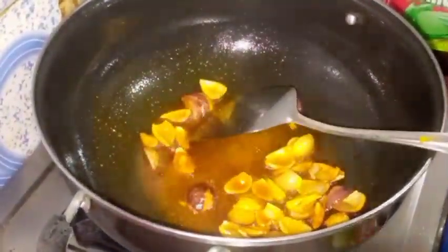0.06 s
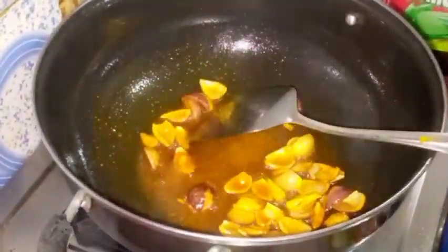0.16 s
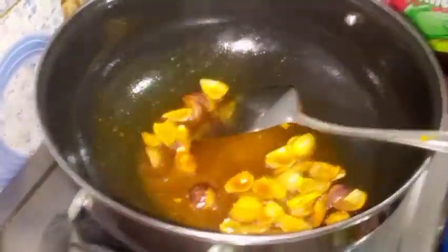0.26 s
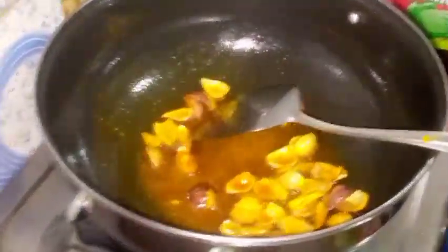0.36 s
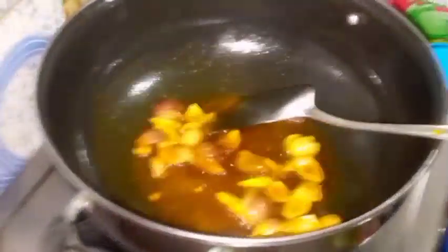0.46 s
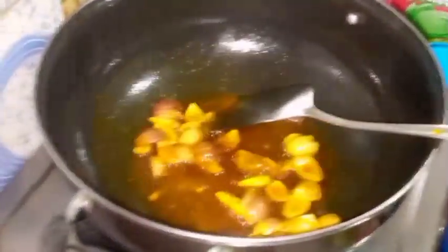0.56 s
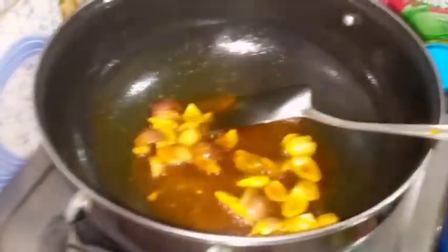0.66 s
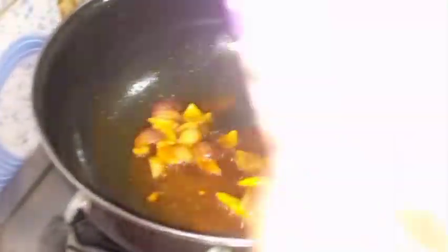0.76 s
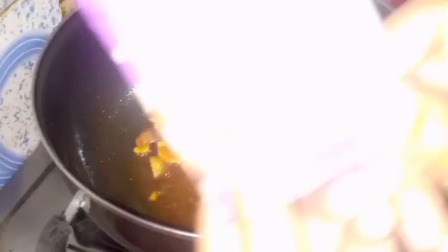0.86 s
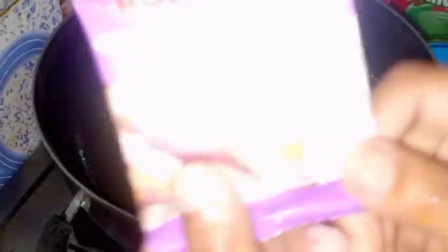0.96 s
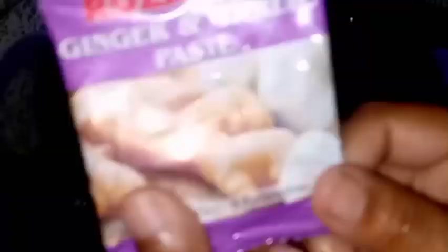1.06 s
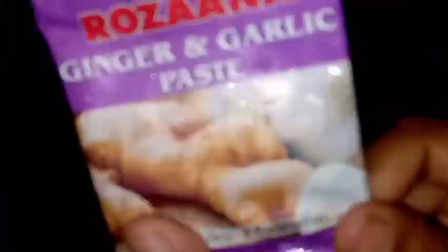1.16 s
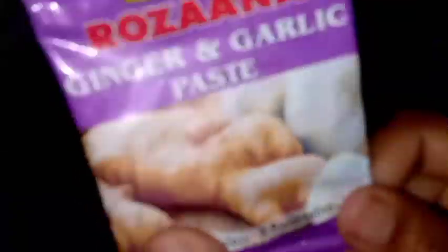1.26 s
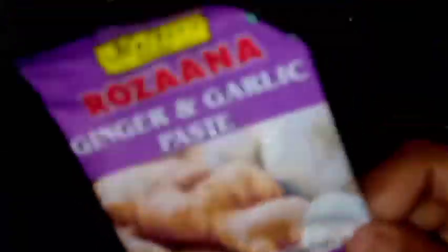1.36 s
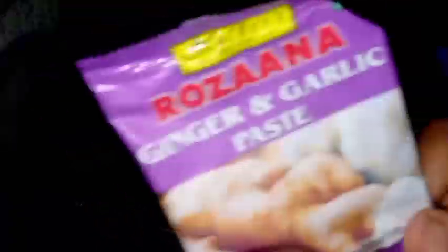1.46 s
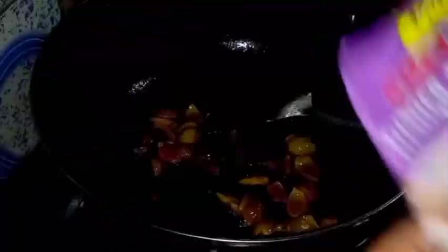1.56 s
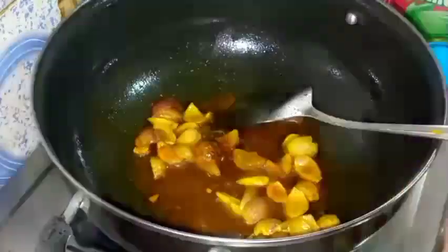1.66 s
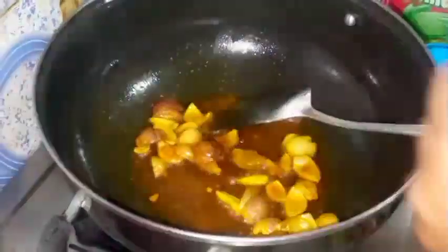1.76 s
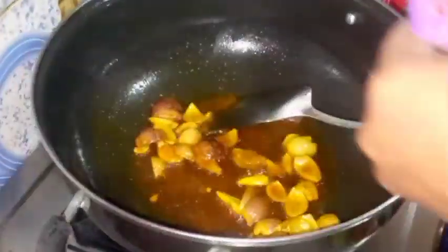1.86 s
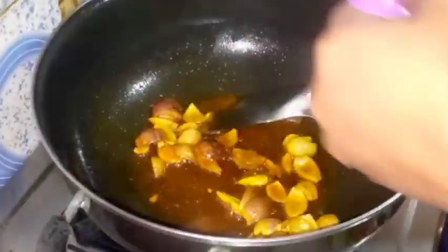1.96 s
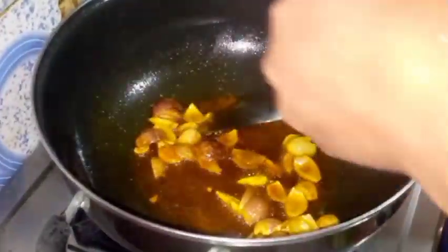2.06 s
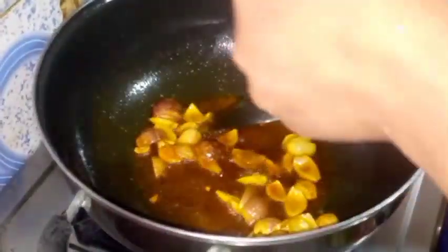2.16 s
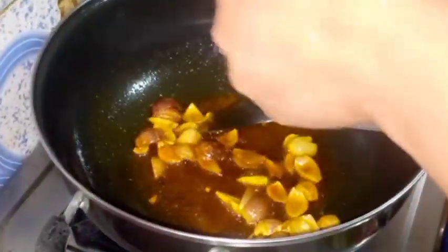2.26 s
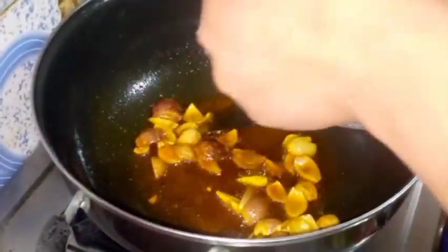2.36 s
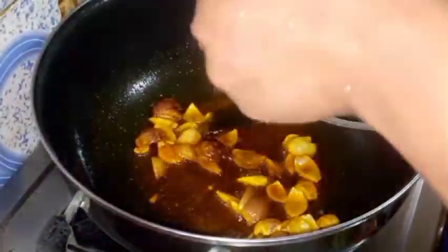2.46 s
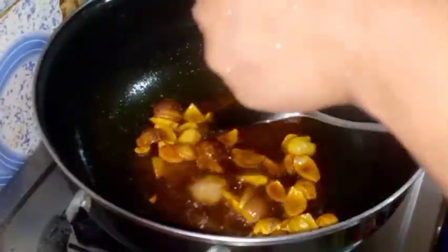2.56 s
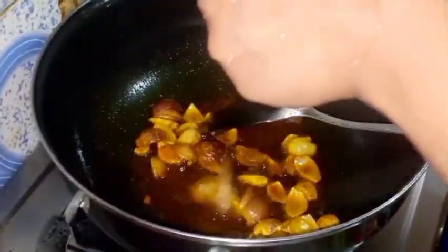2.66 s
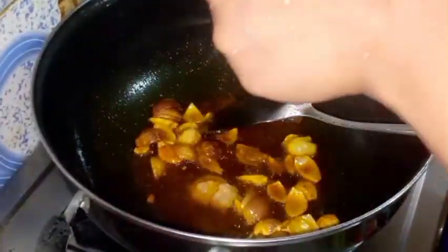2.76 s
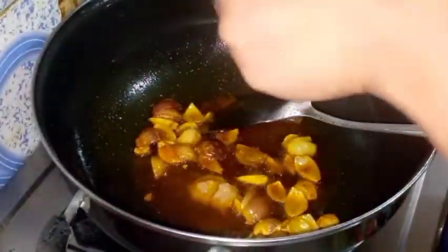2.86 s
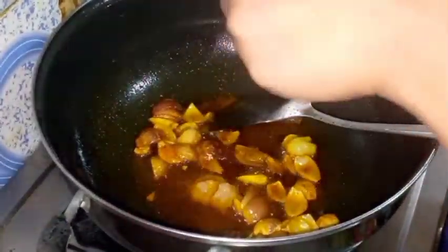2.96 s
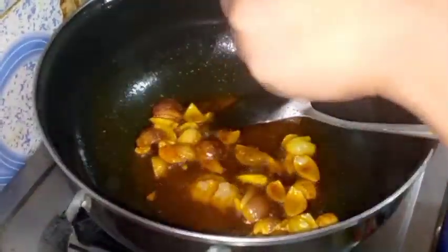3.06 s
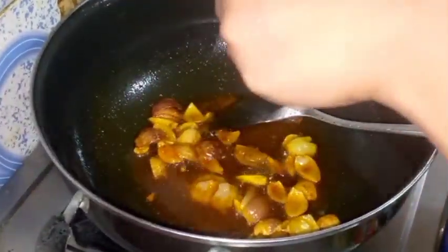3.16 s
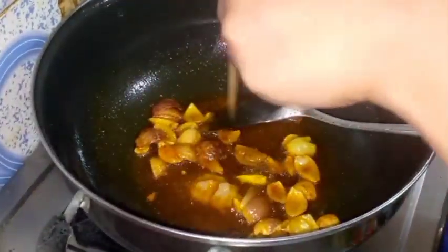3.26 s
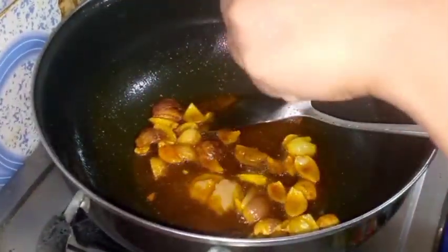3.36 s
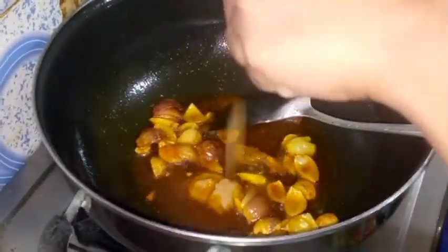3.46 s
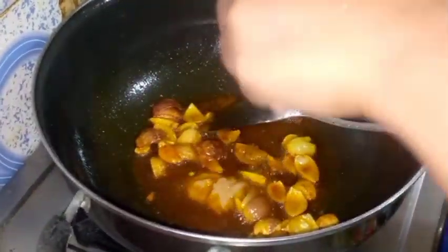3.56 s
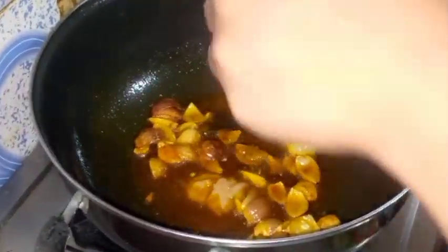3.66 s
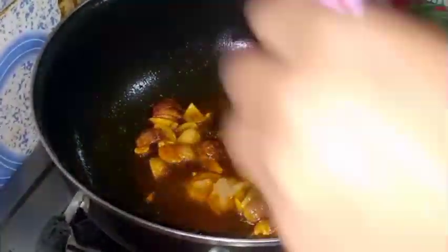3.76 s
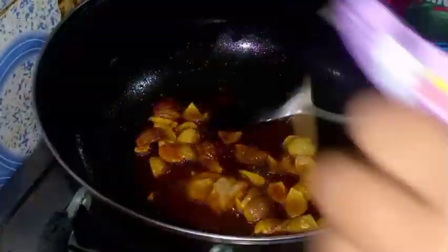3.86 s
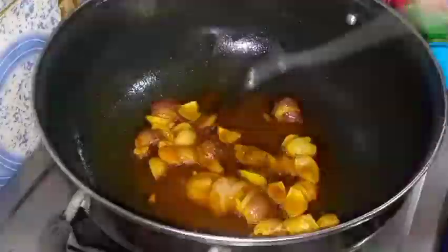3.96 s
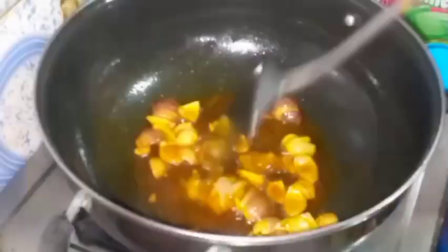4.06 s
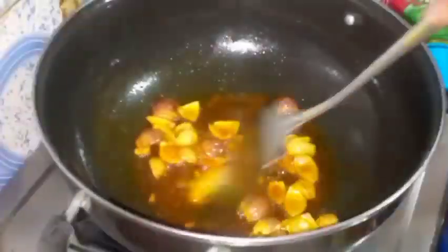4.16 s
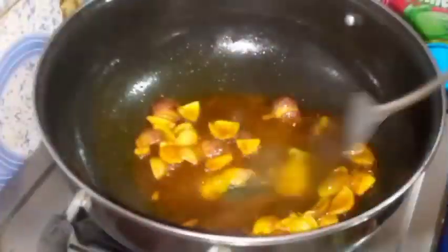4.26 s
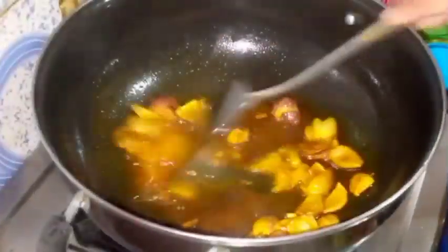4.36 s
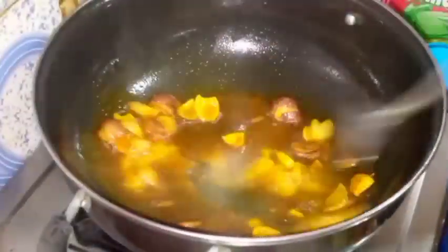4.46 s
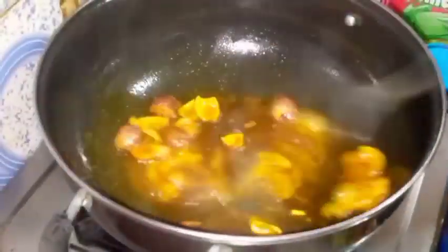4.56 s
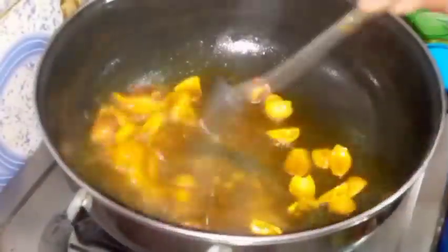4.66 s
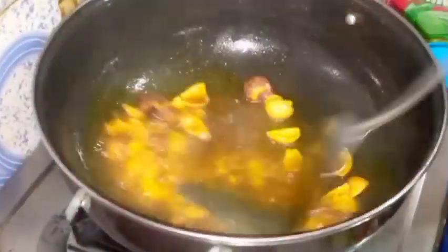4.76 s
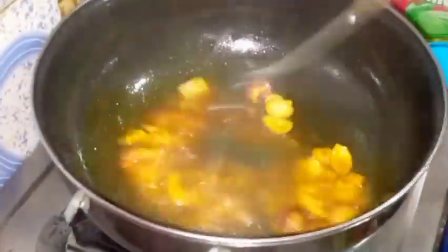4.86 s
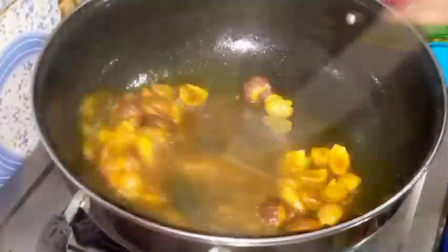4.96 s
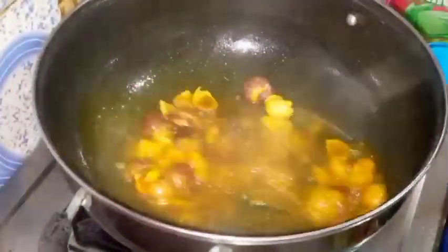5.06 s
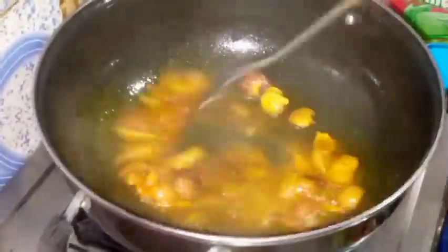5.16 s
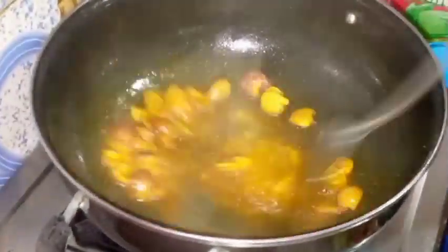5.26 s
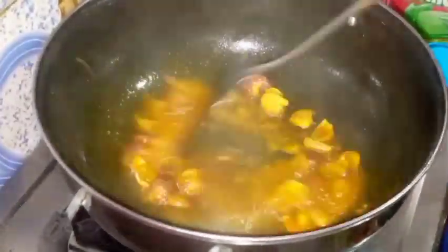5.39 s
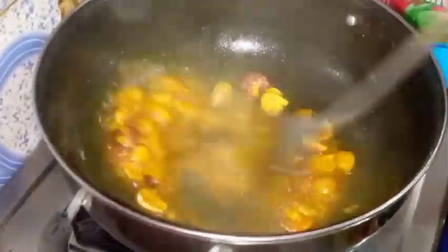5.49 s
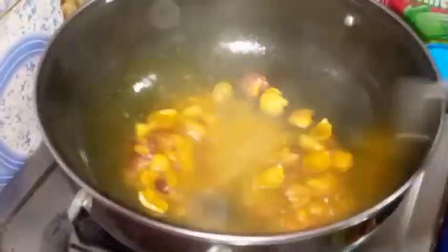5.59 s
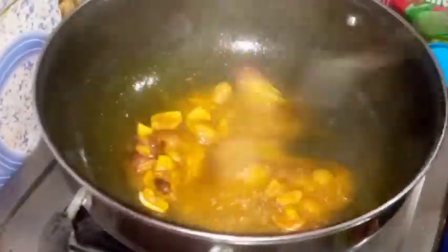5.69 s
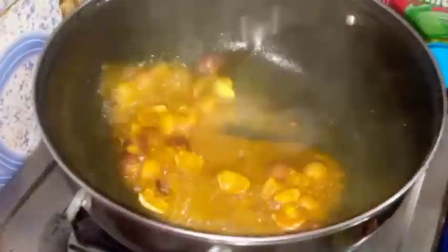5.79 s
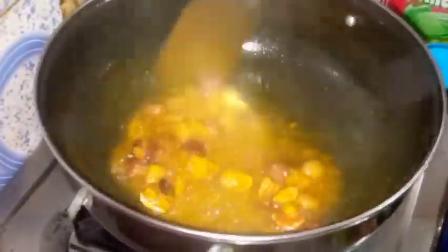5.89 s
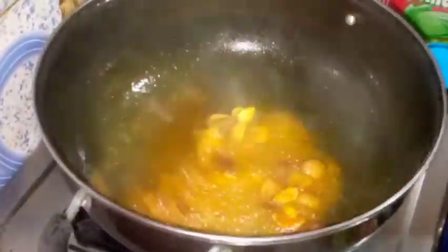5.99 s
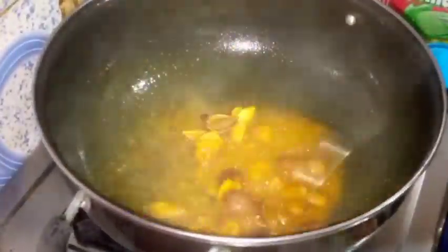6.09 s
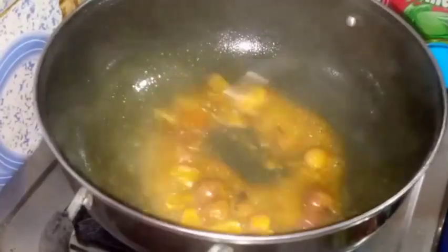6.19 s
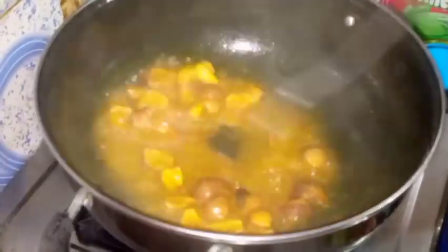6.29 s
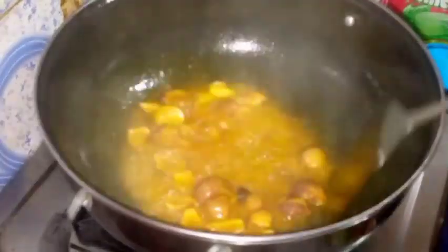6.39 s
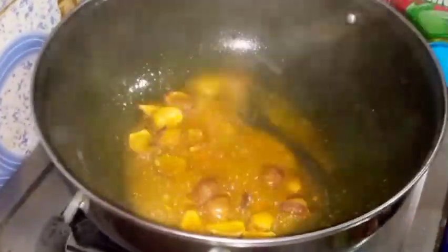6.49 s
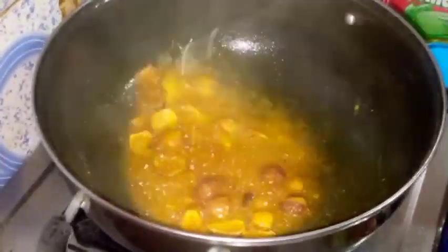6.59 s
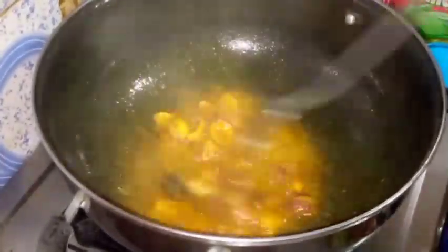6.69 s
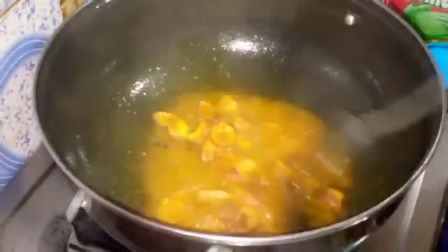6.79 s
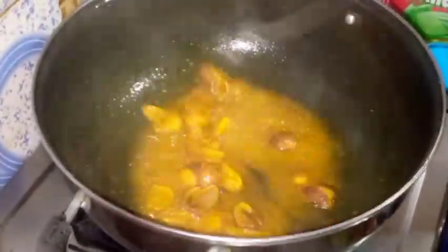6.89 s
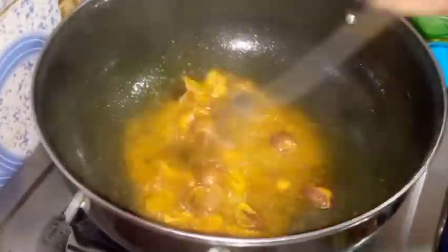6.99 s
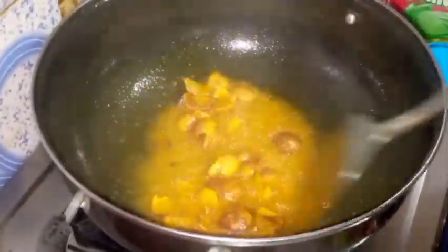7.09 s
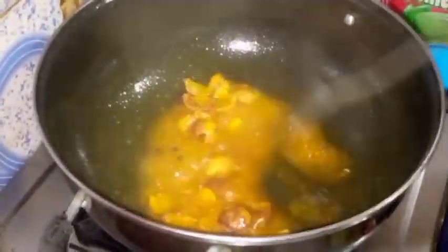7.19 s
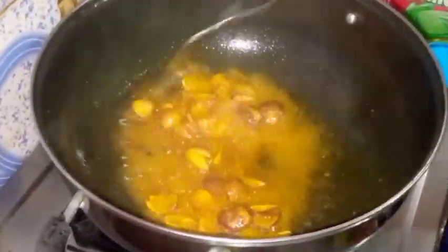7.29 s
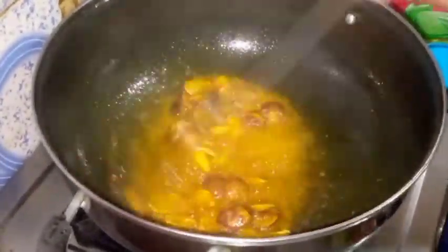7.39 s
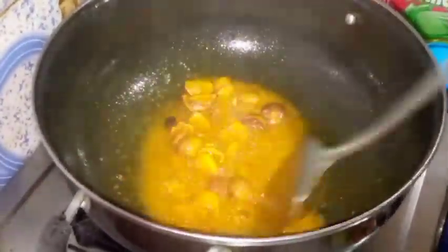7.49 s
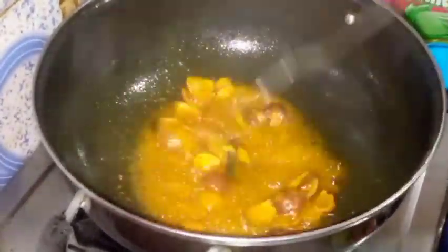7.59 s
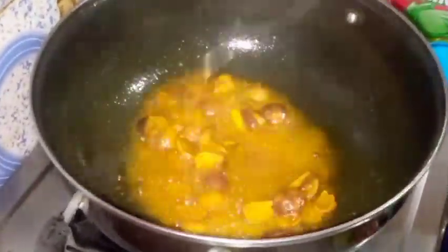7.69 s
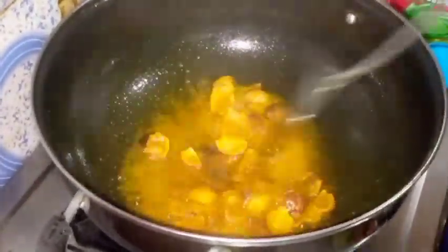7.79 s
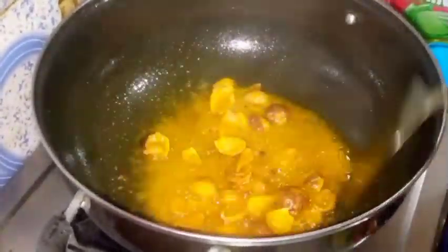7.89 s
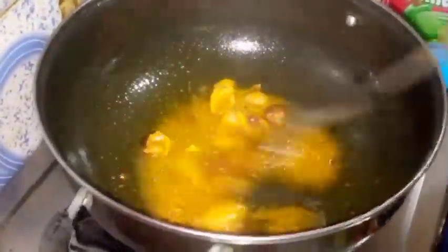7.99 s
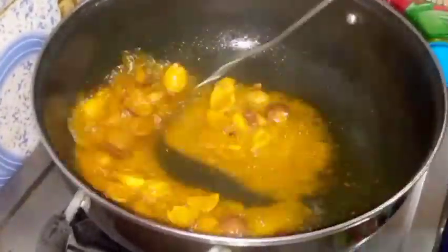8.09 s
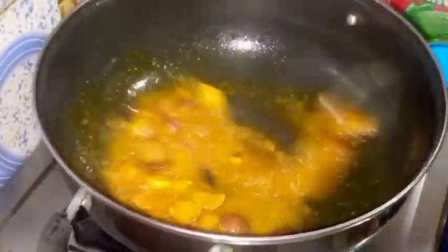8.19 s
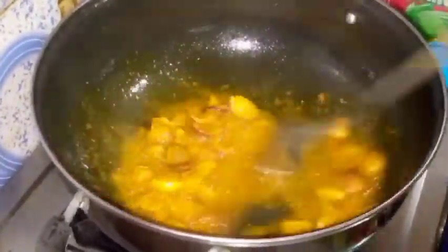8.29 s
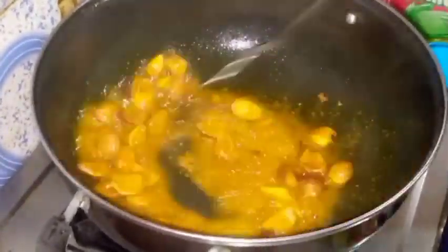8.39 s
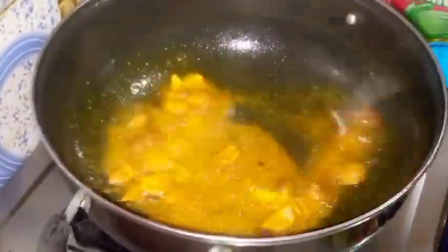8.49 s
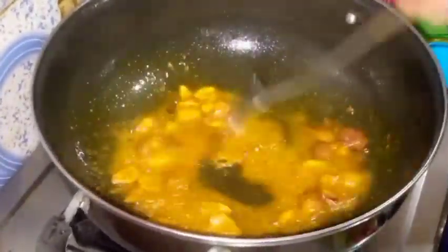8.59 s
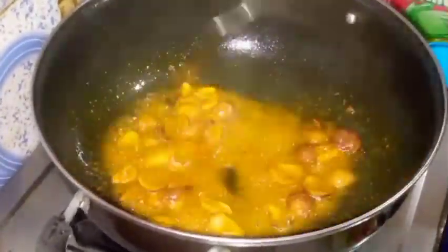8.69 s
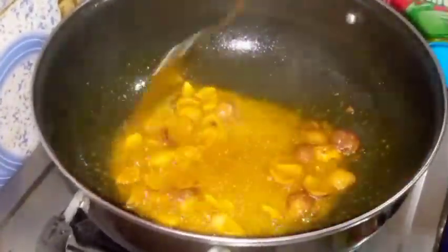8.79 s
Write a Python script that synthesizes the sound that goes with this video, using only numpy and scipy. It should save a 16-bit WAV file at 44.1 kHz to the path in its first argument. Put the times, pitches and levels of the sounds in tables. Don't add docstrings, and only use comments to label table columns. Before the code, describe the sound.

Faint frying with sharp little pops and two low wind thumps, a brief fizz of wet paste, then spatula clanks and a loud, spitting sizzle.

```python
import sys
import numpy as np
from scipy import signal
from scipy.io import wavfile
from scipy.ndimage import uniform_filter1d

SR = 44100
rng = np.random.default_rng(int(sys.argv[2]) if len(sys.argv) > 2 else 0)


def gain_from_db(level_db):
    decades = np.asarray(level_db, float) / 20
    return 10 ** decades


def to_wav(sig):
    pcm = np.clip(np.atleast_2d(sig), -1, 1) * 32767
    pcm = np.round(pcm).astype(np.int16)
    wavfile.write(sys.argv[1], SR, pcm.T)


N = 389844
T = np.arange(N) / SR

STIR_S = (3.8, 4.1)
# (frequency [Hz], density [dB per Hz])
SIZZLE_SPECTRUM = [(1300, -28), (2200, -12), (2980, -4), (3600, -4.5), (4600, -2), (5600, -1.5),
                   (6250, -0.05), (6600, 2.5), (6850, -3), (7500, -7.5), (8200, -8.5), (10700, -15.5),
                   (16000, -61)]


def evened(x):
    return x / np.sqrt(np.mean(x ** 2) + 1e-20)


def add(mix, s, sound):
    part = mix[round(s * SR):][:len(sound)]
    part += sound[:len(part)]


def together(*gains):
    return np.sqrt(sum(gain ** 2 for gain in gains))


def bandpass(x, low_hz, high_hz, order=2):
    sos = signal.butter(order, [low_hz, high_hz], "band", fs=SR, output="sos")
    return signal.sosfilt(sos, x)


def coloured(x, points, size=4096):
    hz, db = np.transpose(points)
    bins_hz = np.fft.rfftfreq(size, 1 / SR)
    half_db = np.interp(np.log(bins_hz + 1), np.log(hz + 1), db, -70, -70)
    log_gain = np.log(gain_from_db(np.r_[half_db, half_db[-2:0:-1]]))
    taps = np.fft.ifft(np.exp(np.conj(signal.hilbert(log_gain)))).real
    return evened(signal.oaconvolve(x, taps)[:len(x)])


def drift(hz):
    lowpass = signal.butter(2, hz, fs=SR, output="sos")
    return evened(signal.sosfilt(lowpass, rng.standard_normal(N)))


def crackle(per_s, spread_db, hiss, flicker_db):
    size = gain_from_db(spread_db * np.minimum(rng.exponential(1, N), 5)) * rng.choice([-1., 1.], N)
    bursts = evened(size * (rng.random(N) < per_s / SR))
    return gain_from_db(flicker_db) * (bursts + hiss * rng.standard_normal(N)) / np.sqrt(1 + hiss ** 2)


def wok(x, lowest_hz, highest_hz, favoured_hz=None):
    # (frequency [Hz], level [dB], time to fall 60 dB [s])
    wall_modes = [(272, -1, .035), (305, -4, .06), (435, -7, .11), (590, -4, .09), (765, -6, .1),
                  (856, -4, .1), (985, -3, .05), (1235, -8, .1), (1440, -2, .06), (1610, -11, .1),
                  (1810, -6, .045), (2030, -4, .03), (2110, -9, .06), (2780, -12, .07)]
    t = np.arange(6000) / SR
    ring = np.zeros(len(t))
    sign = 1
    for hz, db, t60 in wall_modes:
        if lowest_hz < hz < highest_hz:
            if favoured_hz is not None:
                db = db - 16 * abs(np.log2(hz / favoured_hz))
            ring += sign * gain_from_db(db - 60 * t / t60) * np.sin(2 * np.pi * hz * t)
            sign = -sign
    return signal.oaconvolve(x, ring)[:len(x)]


def push_db():
    # (time [s], push [dB], length [s])
    spatula_strokes = [(3.93, 8.5, 0.11), (4.176, 10, 0.06), (4.7, 1, 0.096), (5.35, 0.5, 0.069),
                       (5.428, 5.5, 0.051), (5.66, 0, 0.11), (5.8, -0.5, 0.055), (6.16, 5.5, 1),
                       (6.85, 1, 0.31), (7.167, 5.5, 0.11), (7.46, 4, 0.086), (8.012, 6, 0.024),
                       (8.16, 3.5, 0.66), (8.83, 9, 0.035)]
    return sum(db * np.exp(-((T - s) / length) ** 2) for s, db, length in spatula_strokes)


def levels():
    # (time [s], sizzle level [dB])
    boil_curve = [(0.0, -52), (0.15, -53), (0.4, -51), (1.0, -54.5), (1.26, -53.5), (1.32, -50.5),
                  (1.47, -54.5), (4.13, -50.5), (4.215, -38), (4.27, -37), (4.477, -28), (4.575, -31.5),
                  (4.705, -27.5), (5.28, -25), (6.2, -25.5), (7.45, -28.5), (7.8, -28.5), (8.84, -28)]
    # (time [s], sizzle level [dB])
    fizz_curve = [(2.578, -53), (2.62, -49), (2.71, -48), (2.728, -45.5), (2.79, -48.5), (2.9, -47.5),
                  (3.25, -54), (3.5, -52.5), (4.13, -55.5)]
    boil_db, push = np.interp(T, *np.transpose(boil_curve)), push_db()

    def follow(full_db, share):
        return gain_from_db(full_db + share * (boil_db + 27))

    landing_s = fizz_curve[0][0]
    landed = T > landing_s
    fizz = landed * gain_from_db(np.interp(T, *np.transpose(fizz_curve)))
    foam = fizz * np.interp(T, (2.7, 2.735), [0, 1])
    splash = landed * gain_from_db(-51.5 - 45 * (T - landing_s))
    settling_spray = gain_from_db(3 * np.clip(1 - T / 0.95, 0, 1))
    settling_rumble = gain_from_db(-62 - 99 * T)
    scrape = follow(-50, 0.31) * gain_from_db(push) * np.interp(T, STIR_S, [0, 1])

    sizzle = together(gain_from_db(boil_db), fizz)
    bubbling = together(follow(-41.5, 0.77) * gain_from_db(0.32 * push), foam * gain_from_db(1))
    spray = together(follow(-35.5, 0.84) * settling_spray, fizz * gain_from_db(-16), splash)
    rumble = together(follow(-52, 0.83), foam * gain_from_db(-19), settling_rumble, scrape)
    return sizzle, bubbling, spray, rumble


def frying():
    # (frequency [Hz], density [dB per Hz])
    simmer_spectrum = [(500, -66), (850, -32), (1050, -3), (1220, 5), (1540, 2.5), (1820, 4), (2600, 2.5),
                       (3380, -39)]
    bubble_spectrum = [(470, -11), (800, -4.5), (1110, 2), (1220, 5.5), (1540, 4), (1820, 7), (2600, 0),
                       (3380, -51), (5720, -120)]
    paste_spectrum = [(410, -48), (700, -15.5), (743, -9.5), (943, -6), (1030, 0), (1120, -4.5), (1220, 3),
                      (1370, -5.5), (1580, 0), (1860, -4.5), (2510, -15), (2700, -7.5), (2860, -4),
                      (3400, -25), (4420, -46), (7480, -120)]
    spray_spectrum = [(4350, -52), (7400, 0.5), (8020, -16), (8880, -2), (9870, -3), (13500, -12),
                      (14900, -2), (15200, 2), (15900, -8)]
    scrape_spectrum = [(71, -40), (120, -5.5), (264, 0), (387, -1.5), (431, 4), (514, 1), (1000, 3.5),
                       (1300, 1.5), (2200, -120)]
    still_spectrum = [(88, -52), (150, -22), (334, -10.5), (428, -3), (636, -10), (716, -5.5), (1000, -10),
                      (1300, -25.5), (2200, -120)]
    lump_s = [2.62, 2.73, 3.8, 4.14]

    boil_db = np.interp(T, STIR_S, [1.0, 0.25]) * drift(12.0) + 0.47 * drift(57)
    busy = np.interp(T, STIR_S, [0.55, 1])
    fine = crackle(2500, 2.1, 1.7 * busy, boil_db + 0.5 * drift(35) + 0.083 * drift(9.2))
    large = crackle(900, 2.24, 1.36, 0.68 * boil_db + 1.17 * drift(28) + 0.5 * drift(9.3))
    drag = crackle(400, 3.1, 2.05, 0.5 * boil_db + 0.74 * drift(8.1))
    droplets = crackle(1500, 2.9, 1.5 * busy, 0.62 * boil_db + 1.03 * drift(40))
    mist = 0.24 * fine + 1.24 * droplets

    hollow = evened(bandpass(large, 2740, 3180))
    cupped = gain_from_db(-13.5) * hollow * np.interp(T, (2.05, 2.2, 3.7, 3.9), [0, 1, 1, 0])
    sizzle = coloured(fine, SIZZLE_SPECTRUM) + cupped

    body = np.where(T < lump_s[1], coloured(large, simmer_spectrum), coloured(large, bubble_spectrum))
    foam = body + 0.22 * evened(wok(large, 900, 2400))
    paste_ring = wok(large, 1100, 1300) + 1.2 * wok(large, 1500, 1700)
    paste = coloured(large, paste_spectrum) + 0.3 * evened(paste_ring)
    lump = np.interp(T, lump_s, [0, 1, 1, 0])
    bubbling = lump * paste + (1 - lump) * foam

    spray = coloured(mist, spray_spectrum)

    stirred = np.clip(np.maximum((T - 3.8) / 0.11, 1 - T / 0.27), 0, 1)
    rumble = stirred * coloured(drag, scrape_spectrum) + (1 - stirred) * coloured(drag, still_spectrum)
    rumble = rumble + 0.5 * stirred * evened(wok(drag, 0, 900))

    layers = [(sizzle, 0.59), (bubbling, 0.96), (spray, 0.4), (rumble, 0.25)]
    return sum(evened(x) * gain_from_db(db) * gain for (x, db), gain in zip(layers, levels()))


def patchy(x):
    # (frequency [Hz], spread [dB])
    unevenness = [(300, 2), (1500, 1.4), (3500, 1.2), (8000, 1)]
    hz, _, z = signal.stft(x, SR, nperseg=512)
    field = uniform_filter1d(rng.standard_normal(z.shape), size=6, axis=0)
    field = evened(uniform_filter1d(field, size=9, axis=1))
    spread_db = np.interp(hz, *np.transpose(unevenness))
    return signal.istft(z * gain_from_db(spread_db[:, None] * field), SR, nperseg=512)[1][:N]


def kitchen():
    # (frequency [Hz], density [dB per Hz])
    room_spectrum = [(12, -44), (20, -35), (43, -1), (65, 5.5), (113, -1.5), (205, -13), (220, -2),
                     (290, -57), (480, -120)]
    shake_spectrum = [(12, -49), (20, -31), (60, -3.5), (146, -12.5), (220, -2), (290, -35), (480, -120)]
    noise = rng.standard_normal(N)
    shaken = np.clip((T - 4.1) / 0.14, 0, 1)
    resting_db = -77 + 4.5 * np.clip((T - 2.25) / 0.06, 0, 1)
    shaking_db = -67.5 + 0.51 * push_db()
    db = (1 - shaken) * resting_db + shaken * shaking_db
    rumble = (1 - shaken) * coloured(noise, room_spectrum) + shaken * coloured(noise, shake_spectrum)
    return rumble * gain_from_db(db + 2 * drift(5))


def skid():
    t, bounces = np.arange(900) / SR, np.zeros(1500)
    bounces[[20, 200, 335]] = [1, 0.8, 0.35]
    grit = coloured(rng.standard_normal(900), SIZZLE_SPECTRUM) * gain_from_db(-60 * t / 0.013)
    return bounces, signal.oaconvolve(bounces, grit)[:1500]


def knock(db, clank_db, low_hz, high_hz):
    bounces, scratch = (np.pad(x, (0, 4500)) for x in skid())
    t = np.arange(6000) / SR
    blow = bandpass(bounces * (t < 0.003), 190, 5000)
    low = wok(blow, 0, 700, low_hz)
    high = wok(blow, 700, 3000, high_hz)
    low, high = (0.71 * ring / ring[:500].std() for ring in (low, high))
    tick = bandpass(bounces, 500, 1700)
    clank = high + 1.9 * tick / tick.max()
    return gain_from_db(db) * (low + gain_from_db(clank_db) * clank + gain_from_db(-8) * scratch)


def pop(db, hz):
    t = np.arange(1500) / SR
    noise = rng.standard_normal(len(t))
    splash = evened(bandpass(noise, 0.89 * hz, min(1.1 * hz, 15000), order=1))
    splash = splash * np.minimum(t / 0.002, 1) ** 2
    ping = np.sin(2 * np.pi * hz * t) * np.exp(-((t - 0.002) / 0.00035) ** 2)
    return gain_from_db(db) * (0.9 * ping + 0.43 * splash * gain_from_db(-60 * t / 0.028))


def small_pops():
    per_s = 30
    slots = np.arange(0, STIR_S[1], 1 / per_s)
    late, size, pitch = rng.random((len(slots), 3)).T
    db = -47.5 + 10.0 * (size - 0.5)
    hz = 6300 * (0.65 + 0.8 * pitch)
    return list(zip(slots + late / per_s, db, hz))


def eddy(db, edge_db, lump_db, lump_hz):
    t = np.arange(-600, 600) / SR
    turn = rng.uniform(0, 2 * np.pi, size=3)
    lump = np.exp(-(t * lump_hz / 0.59) ** 2) * np.cos(2 * np.pi * lump_hz * t + turn[0])
    body = np.exp(-(t / 0.0014) ** 2) * np.cos(2 * np.pi * 430 * t + turn[1])
    edge = np.exp(-(t / 0.00099) ** 2) * np.cos(2 * np.pi * 800 * t + turn[2])
    return gain_from_db(db + 2.0) * (gain_from_db(lump_db) * lump + body + gain_from_db(edge_db + 1.5) * edge)


def gusts():
    # (time [s], air level [dB], turbulence over air [dB], air speed [1 = usual])
    packet_gusts = [
        [(0.928, -36, -24, 0.74), (.96, -34.5, -24, 0.71), (1.0, -29, -9, 1), (1.02, -27, -16, 1),
         (1.062, -25, -13, 1.07), (1.075, -38, -17, .9), (1.116, -43, -12, 1.1), (1.14, -66, -12, 0.77)],
        [(1.452, -45, -31, .9), (1.5, -27, -10, 1.2), (1.526, -24, -4, 1.32), (1.56, -33, -22, .8),
         (1.62, -54, -33, 0.67)],
        [(2.28, -54, -12, 1.4), (2.3, -48, 4, 1.42), (2.39, -63.5, 7, 1.75), (2.52, -71, 4, 1.2)],
    ]
    # (time [s], peak [dB], bright edge [dB rel], low lump [dB rel], lump pitch [Hz])
    sharp_eddies = [(0.942, -49, -20, 21, 100), (0.9695, -32, -24, 4, 200), (0.983, -41, -23, 18, 150),
                    (1.0171, -31, -15, 10, 150), (1.025, -34, -11, 6, 250), (1.048, -25, -22, 2, 200),
                    (1.056, -26.5, -8, 7.5, 200), (1.082, -43, -14, 10, 140), (1.095, -48, -20, 9, 200),
                    (1.115, -53, -10, 9, 200), (1.473, -54, -15, 19, 190), (1.484, -45, -22, 6, 220),
                    (1.494, -27, -12, 5, 242), (1.507, -27, -17, 6, 190), (1.525, -27.5, -5.5, 3, 210),
                    (1.541, -22.5, -27, 4.5, 188), (1.567, -34, -26, 1, 260), (1.59, -57, -18, 10, 170)]
    # (frequency [Hz], density [dB per Hz])
    air_spectrum = [(15, -38), (30, -24), (55, -10.5), (115, 4), (167, -6.5), (230, -14), (303, -20.5),
                    (350, -23), (460, -34), (770, -120)]
    swirl_spectrum = [(150, -34), (250, -32), (297, 3), (411, 9), (503, 4.5), (620, -1.5), (1600, -36),
                      (2080, -100), (3520, -120)]
    air = coloured(gain_from_db(1.5 * drift(45)) * rng.standard_normal(N), air_spectrum)
    swirl = coloured(gain_from_db(3 * drift(45)) * rng.standard_normal(N), swirl_spectrum)
    air = air / np.sqrt(abs(uniform_filter1d(air ** 2, 900)) + 0.1)
    out = np.zeros(N)
    for rows in packet_gusts:
        s, air_db, swirl_db, speed = np.transpose(rows)
        span = slice(round(s[0] * SR), round(s[-1] * SR))
        t = T[span]
        place = span.start + np.cumsum(np.interp(t, s, speed))
        push = evened(np.interp(place, np.arange(N), air))
        blow = push + 0.44 * evened(swirl[span]) * gain_from_db(np.interp(t, s, swirl_db))
        fade = signal.windows.tukey(len(blow), 0.18)
        add(out, s[0], blow * gain_from_db(np.interp(t, s, air_db)) * fade)
    for s, *kink in sharp_eddies:
        add(out, s - 600 / SR, eddy(*kink))
    return out


def scene():
    # (time [s], peak [dB], clank [dB rel], favoured low mode [Hz], favoured high mode [Hz])
    spatula_blows = [(0.02, -58, -8, 380, 790), (0.165, -60.5, -10, 377, 800), (0.458, -64, -12, 380, 800),
                     (3.901, -50, -6, 280, 1220), (3.959, -51, 3, 590, 1220), (4.05, -49, -3, 288, 864),
                     (4.09, -51, -8, 275, 864), (4.1405, -29.5, -11, 298, 2030),
                     (4.141, -45.5, 9, 590, 1440), (4.147, -43, 7, 600, 856), (4.161, -38, 1, 400, 850),
                     (4.179, -34.5, -10, 297, 830), (4.307, -45, -8, 426, 1230), (4.455, -51, 4, 430, 2110),
                     (4.634, -51, 0, 590, 1200), (4.929, -44, -7, 590, 1400), (5.481, -47, -5, 420, 1230),
                     (5.653, -38, 1, 302, 1190), (6.145, -36, 1, 270, 1800), (6.29, -50.5, 17, 430, 1660),
                     (6.446, -41, -2, 560, 1450), (6.825, -40, 2, 270, 1580), (6.91, -48, 8, 440, 2190),
                     (7.186, -40.5, -9, 296, 1680), (7.3589, -28.5, 1.5, 295, 1050),
                     (7.3639, -39, -0.5, 433, 1300), (7.379, -39, 7, 430, 750), (7.382, -46, 6, 300, 1235),
                     (7.42, -42, 3, 430, 1400), (7.533, -44, 0, 584, 1230), (7.963, -37, 5, 267, 1820),
                     (8.386, -41, -8, 450, 1000), (8.636, -43.5, 1, 435, 1000),
                     (8.805, -38.5, -2, 390, 1420)]
    # (time [s], peak [dB], pitch [Hz])
    clear_pops = [(0.0227, -38, 5020), (0.055, -38, 6500), (0.1925, -33, 6660), (0.2584, -37, 6700),
                  (0.2735, -33, 3780), (0.388, -37, 6600), (0.3934, -35, 6140), (0.4034, -34, 6420),
                  (0.408, -32, 5600), (0.4307, -32, 9150), (0.447, -35, 4000), (0.4644, -34, 6270),
                  (0.473, -32, 6170), (0.5434, -41, 6520), (0.624, -27, 8500), (0.6858, -29, 4960),
                  (0.7607, -37, 5690), (0.8126, -35, 9410), (0.8779, -42, 4690), (1.0191, -33, 6500),
                  (1.1767, -33, 6300), (1.282, -26.5, 5700), (1.2944, -33, 4720), (1.3693, -32, 6310),
                  (1.4102, -35, 5030), (1.4546, -34, 5990), (1.4975, -35, 7330), (1.56, -34, 6600),
                  (1.6093, -23.5, 5800), (1.6656, -32, 5610), (1.708, -35, 6320), (1.7953, -38.5, 6660),
                  (1.943, -30, 6160), (1.9809, -31, 5760), (2.0143, -32, 6100), (2.0552, -34, 6510),
                  (2.072, -30.5, 6500), (2.1036, -36, 7450), (2.1246, -33, 6230), (2.2707, -28, 6580),
                  (2.301, -36, 3100), (2.3251, -31, 6640), (2.376, -34, 5980), (2.4927, -36, 6460),
                  (2.5845, -29, 6600), (2.6065, -24.5, 6600), (2.7386, -26, 6700), (2.8634, -33, 6300),
                   (2.9223, -32, 6640), (2.9941, -31, 6730), (3.1168, -29, 6500), (2.921, -38, 4170),
                   (3.36, -37, 3000), (3.5486, -30, 6840), (3.63, -34, 4100), (3.756, -31, 4340),
                   (3.7554, -20, 5830), (3.7783, -30, 6140), (3.8706, -31, 7400), (4.142, -16, 6670),
                   (4.1455, -21, 2950), (4.226, -33, 6550), (4.4366, -19, 6140), (4.4574, -23, 6450),
                   (4.5904, -15, 6270), (4.6157, -13, 6640), (4.6564, -29, 5970), (4.9326, -25, 6350),
                   (5.0157, -12, 4790), (5.5114, -14, 6900), (5.5894, -16, 6300), (5.6156, -12, 6400),
                   (5.9294, -15, 6000), (6.1667, -36, 6630), (6.3217, -20, 6570), (6.5474, -29, 5640),
                   (6.978, -14, 6360), (7.6394, -23, 6660), (7.9653, -15, 6050), (8.2995, -23, 5900)]
    mix = patchy(frying()) + kitchen() + gusts()
    for s, *blow in spatula_blows:
        add(mix, s, knock(*blow))
    _, scratch = skid()
    add(mix, 4.1408, gain_from_db(-19.5) * scratch)
    for s, *drop in clear_pops + small_pops():
        add(mix, max(s - 0.001, 0), pop(*drop))
    return mix[None]


def roll_off(x):
    return signal.sosfilt(signal.butter(12, 17070, fs=SR, output="sos"), x)


def record(dry):
    start, end = 5.304, 5.326
    dip_db = -5.5 * np.interp(T, [start, start + 0.0022, end, end + 0.0051], [0, 1, 1, 0])
    throb_hz = 48000 / 1024
    throb_db = 1.03 * np.cos(2 * np.pi * throb_hz * T + 0.32)
    limit = signal.firwin(2047, 15830, window=("kaiser", 11), fs=SR)
    limited = signal.oaconvolve(dry * gain_from_db(throb_db + dip_db), limit[None], "same")
    return roll_off(limited)


dry = scene()
out = record(dry)
to_wav(out)
```